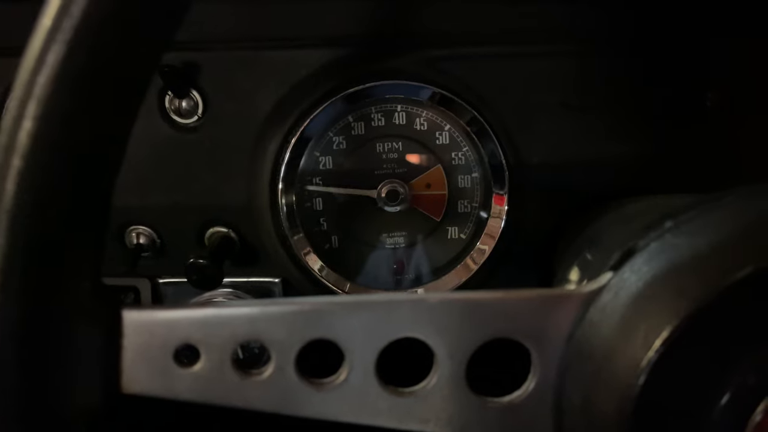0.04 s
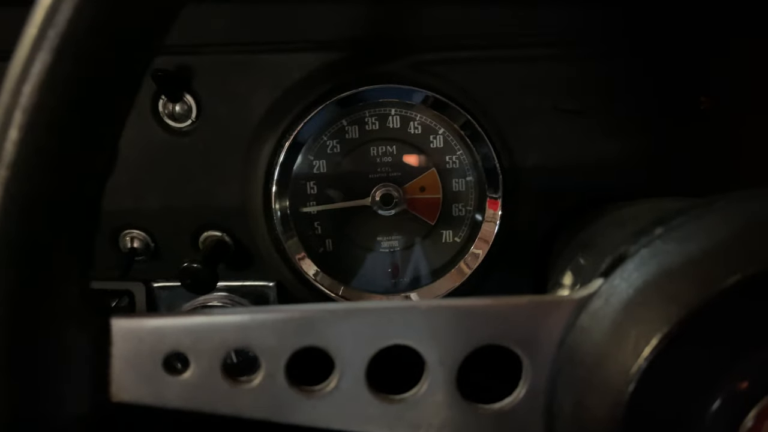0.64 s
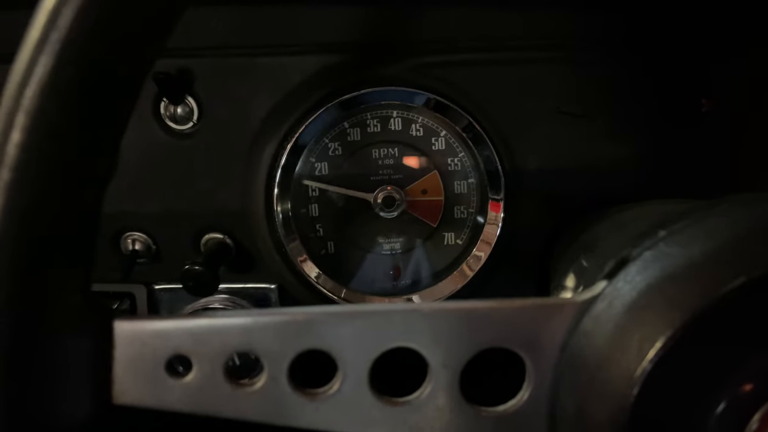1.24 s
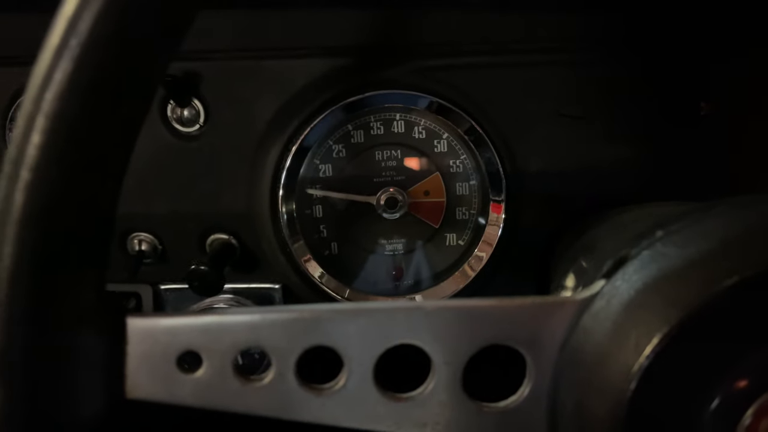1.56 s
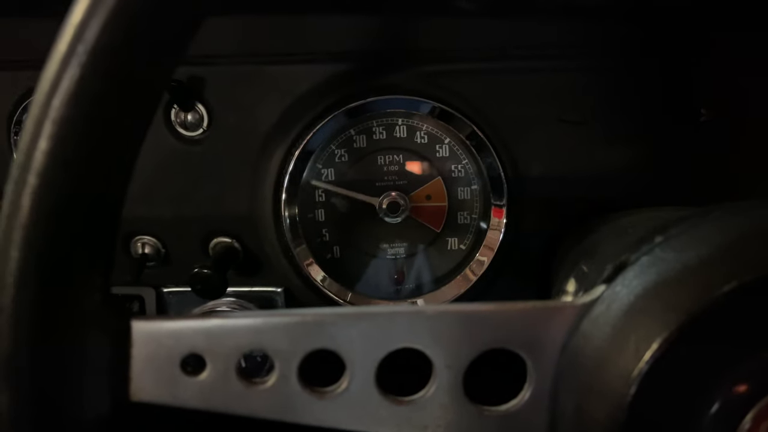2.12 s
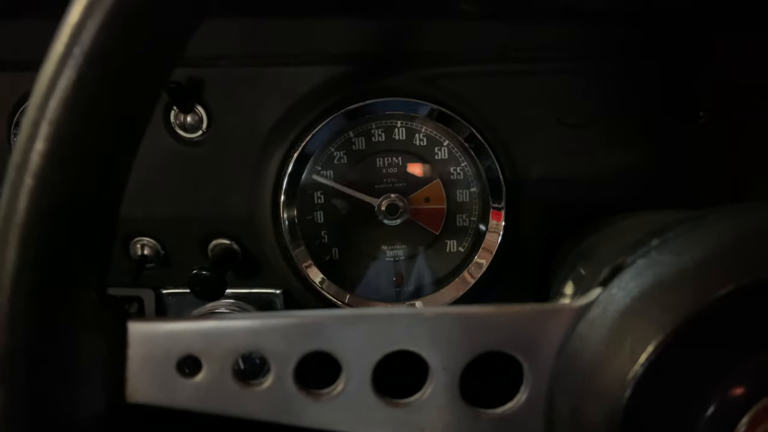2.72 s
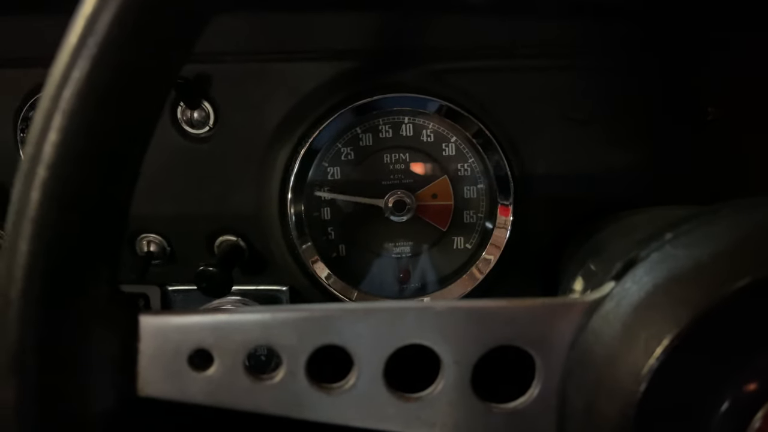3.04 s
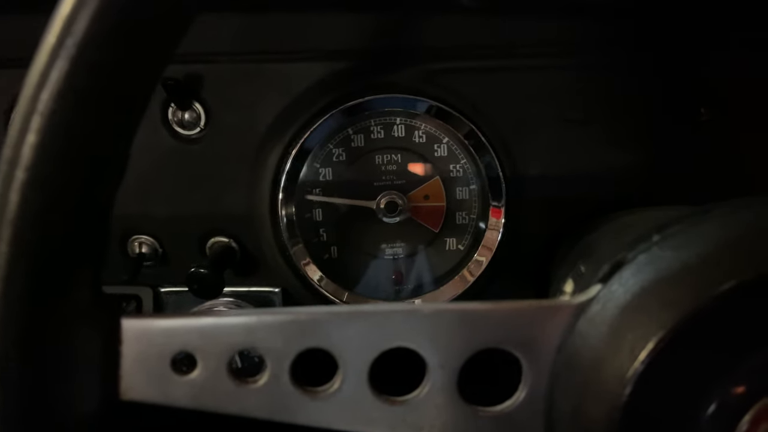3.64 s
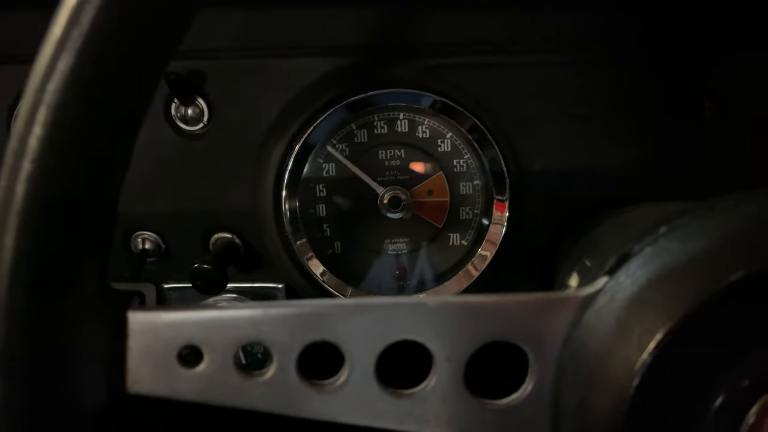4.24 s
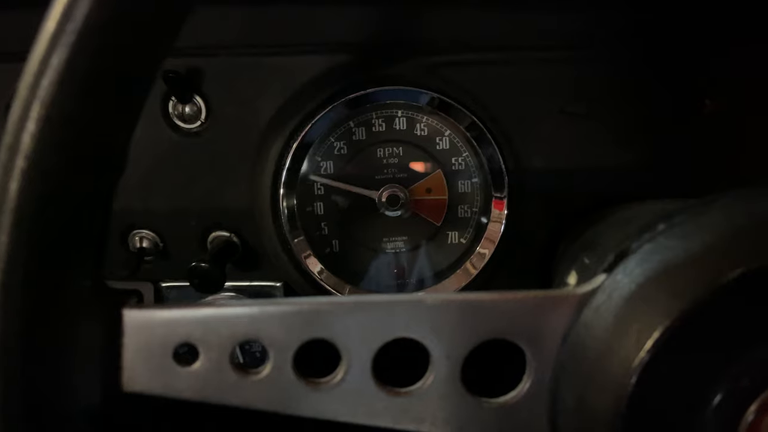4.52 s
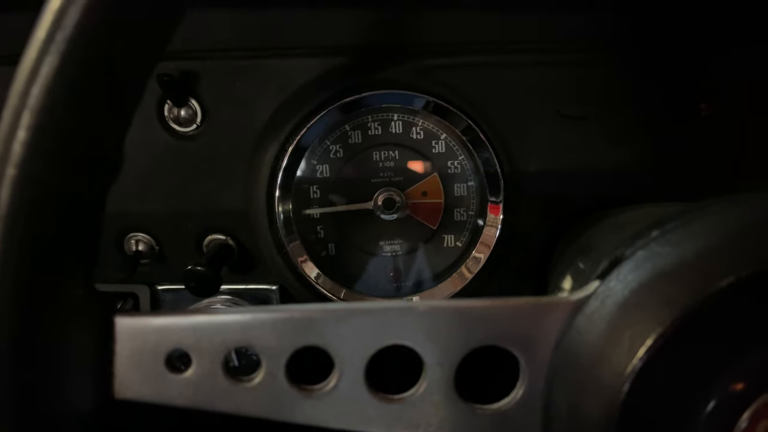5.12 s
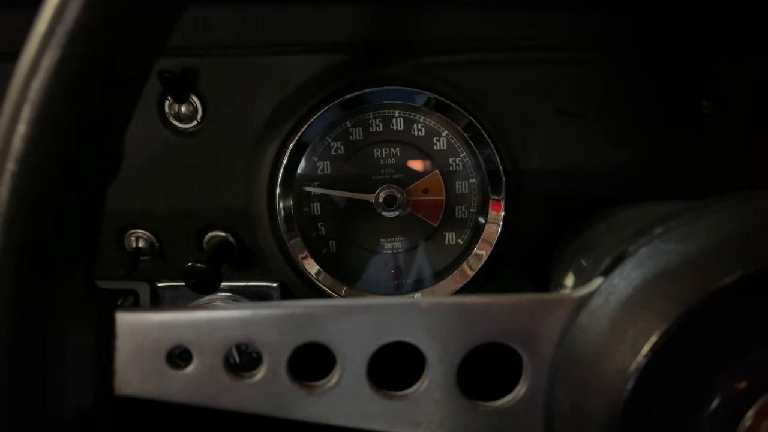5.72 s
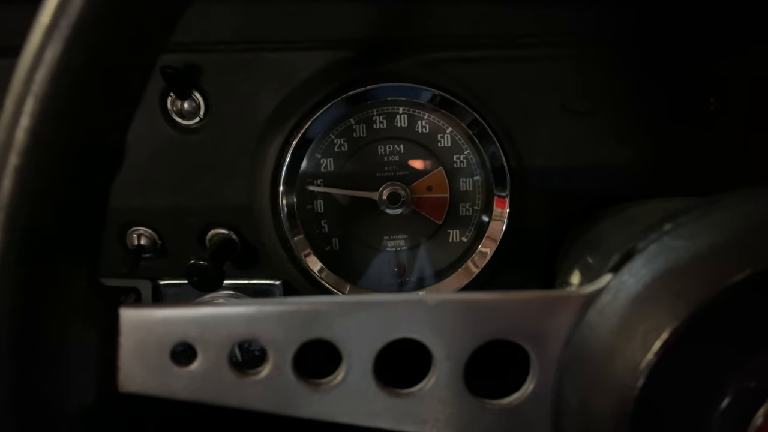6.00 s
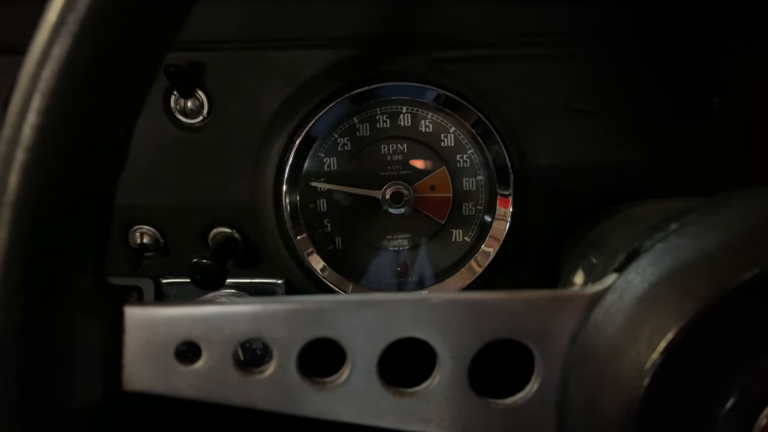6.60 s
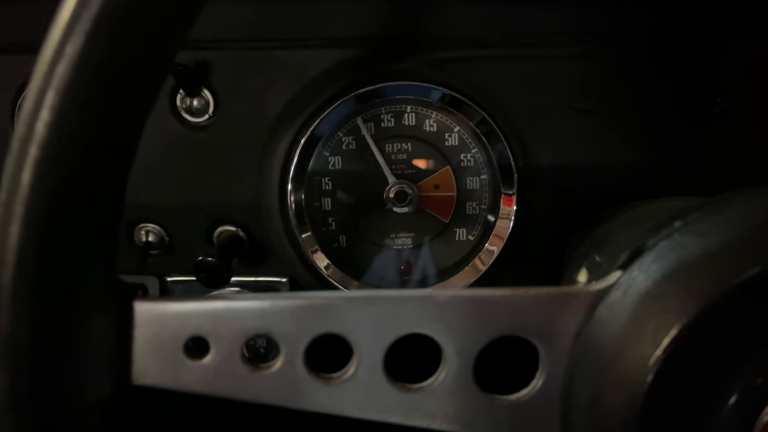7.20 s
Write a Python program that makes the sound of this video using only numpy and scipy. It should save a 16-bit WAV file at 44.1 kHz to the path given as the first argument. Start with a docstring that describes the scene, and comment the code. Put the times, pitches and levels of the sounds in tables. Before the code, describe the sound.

Inside a small car, a misfiring engine throbs deeply and close by, with light valve ticking. A weak rev is followed by two sharper ones, then the engine nearly dies. It picks up into a low, sputtering stretch with a few exhaust cracks before a final, higher rev. Every surge brings a rough exhaust bark, a spitting intake hiss and small metallic pings, while the low notes boom in the tight cabin.

```python
"""Stumbling sports car, from the driver's seat

A four-cylinder engine stumbles near idle and is blipped five times. Uneven firings and misfires
boom in the cabin; with the throttle open the exhaust barks and the carburettors hiss and spit.
The valve gear ticks, and a loose metal part pings and chatters under load."""
import sys
import numpy as np
from scipy import signal
from scipy.fft import rfft, irfft, next_fast_len
from scipy.io import wavfile
from scipy.ndimage import uniform_filter1d, minimum_filter1d, map_coordinates

SR = 44100
rng = np.random.default_rng(int(sys.argv[2]) if len(sys.argv) > 2 else 0)


def bounce(signal):
    """Save signal as a 16-bit WAV file at the path given by the first command-line argument."""
    frames = np.transpose(np.atleast_2d(signal))
    limited = np.clip(frames, -1, 1)
    pcm = np.round(limited * 32767).astype(np.int16)
    wavfile.write(sys.argv[1], SR, pcm)


N = 324135

# engine speed: t/s, firing rate/Hz
FIRING_RATE = [(0, 50), (.14, 49.5), (.22, 38.4), (.33, 33.4), (.45, 31.8), (.55, 31.9), (.68, 45),
               (.96, 56.7), (1.04, 57.7), (1.25, 55.3), (1.35, 52.8), (1.58, 45), (1.76, 42.3), (1.85, 54),
               (2.01, 59.9), (2.2, 85), (2.31, 90.3), (2.39, 84.9), (2.58, 67.8), (2.76, 59.8),
               (3.01, 45.7), (3.09, 43.9), (3.23, 38.5), (3.34, 35.8), (3.47, 50.2), (3.75, 51.6),
               (3.87, 70), (3.99, 83.5), (4.06, 89.5), (4.13, 84), (4.3, 64.9), (4.38, 58.4), (4.65, 45.6),
               (4.73, 43.7), (4.83, 36.6), (5.24, 33.6), (5.36, 45.8), (5.42, 50.8), (5.55, 49.3),
               (5.65, 50.3), (5.87, 48.8), (6.05, 45.5), (6.39, 50.3), (6.65, 49.1), (6.74, 59.5),
               (6.9, 79.7), (7, 93.2), (7.12, 102.7), (7.19, 99.2), (7.35, 86.8)]
# accelerator: press/s, lift/s, depth/0-1, opening time/s, closing time/s, air gulp/dB
PEDAL = [(0.58, 1.19, 0.78, 0.023, 0.18, 0.5), (1.775, 2.312, 0.99, 0.054, 0.072, 3.5),
         (3.352, 4.058, 0.95, 0.027, 0.047, 1), (5.271, 6.587, 0.83, 0.039, 0.046, 4),
         (6.672, 7.159, 0.84, 0.0073, 0.066, 1.5)]
# cylinders in firing order: strength/dB
CYLINDERS = [4.5, 0, 0, 0]
# stumbles: t/s, depth/dB
MISFIRES = [(.51, 13), (.955, 6), (1.07, 11), (1.275, 8), (2.025, 9), (2.47, 12), (2.72, 13), (2.835, 13),
            (3.73, 7), (4.425, 23), (4.505, 15), (4.75, 2), (6.11, 14), (6.65, 4), (6.905, 7)]
# brief swells of the exhaust roar: t/s, swell/dB
SWELLS = [(.61, 3.5), (.98, 6), (1.12, 8.5), (2.075, 4), (2.15, 4), (2.24, 1.5), (3.87, 10.5), (3.96, 2),
          (5.5, 2.5), (5.65, 3.5), (5.72, 5.5), (6.55, 2), (6.78, 12.5), (6.88, 2), (7.28, 8.5)]
# carburettor spit-backs: t/s, swing/dB
SPITS = [(.977, 3.5), (1.115, 2.5), (1.978, 3.5), (2.1, 2.5), (2.155, 0), (3.631, 4), (3.695, 3),
         (3.88, -2.5), (3.97, 0.5), (4.04, 2.5), (5.511, 4.5), (5.576, 2), (5.656, 5.5), (5.727, 3),
         (5.829, 4.5), (5.899, 3), (5.989, 3), (6.071, 3), (6.17, 5), (6.263, 3.5), (6.34, 3.5), (6.406, 4),
         (6.501, 3.5)]
# near-stalls: t/s, depth/dB
LULLS = [(.25, 2), (.45, -1), (4.78, 1)]
# low orders: multiple of firing rate, cabin boom level/dB, pipe note level/dB
ORDERS = [(.5, -35, -6.5), (.75, -23, -1), (1, 2, -17), (1.5, -19, -11.5), (2, -4, 0), (2.5, -26, -8),
          (3, -3.5, 2.5), (3.5, -35, 0.5), (4, -8.5, -13.5), (5, -7, -1), (6, -9, -5), (7, -13, -5.5)]
# one order booms or drops out: t/s, multiple of firing rate, swing/dB
ORDER_SWINGS = [(.1, 2, -10), (.1, 4, -12), (.43, 3, -8), (.79, 4, 7), (1.46, 4, 7), (1.66, 1, -16),
                (1.78, 4, 7), (1.9, 1, 4), (1.92, 2, -6), (2.58, 1, 3.5), (2.61, 3, -10), (2.76, 3, 7),
                (2.95, 4, 4), (3.11, 1, -11), (3.84, 3, 4), (4.38, 3, -8), (4.55, 4, -9), (4.74, 1, -10),
                (6, 3, -11), (6.32, 4, 5), (6.6, 1, -8), (6.79, 3, 4), (7.26, 2, 7)]
# cabin response to tones: f/Hz, level/dB
BOOM_SPECTRUM = [(32, -55), (40, -22.5), (44, -14.5), (48, -11.5), (68, -11), (90, -13), (100, -19),
                 (112, -15), (128, -24.5), (160, -30), (220, -33.5), (330, -40.5), (450, -39), (600, -58)]
# cabin air modes: f/Hz, width/Hz, lift/dB
CABIN_MODES = [(178, 10, 16), (198, 11, 17), (256, 14, 16), (302, 16, 10), (443, 24, 7)]
# exhaust note, throttle open: f/Hz, level/dB
PIPE_SPECTRUM = [(50, -15.5), (100, -16.5), (140, -11), (175, -22), (200, -13), (235, -22.5), (275, -37),
                 (320, -25), (380, -33), (440, -23.5), (520, -60)]
# cabin response to thuds: f/Hz, level/dB
THROB_SPECTRUM = [(33, -67.5), (49, 15.5), (70, 20), (110, 10), (160, 5.5), (215, 1.5), (240, -9),
                  (310, -12), (380, -16.5), (700, -51.5)]
# exhaust under load: f/Hz, level/dB
BARK_SPECTRUM = [(150, -36.5), (320, 3.5), (400, -0.5), (540, 0.5), (900, -4.5), (1100, -12.5),
                 (1600, -19.5), (2400, -13.5), (4000, -33.5), (9000, -69)]
# pipe and panel resonances: f/Hz, width/Hz, lift/dB
PANEL_MODES = [(176.9, 8.2, 11), (196.5, 4.5, 3.5), (255.2, 6.5, 12.5), (300, 22, 3.5), (443, 22, 8),
               (590, 8, 1.5), (672, 21, 7.5), (746.8, 21, 9.5), (767, 154, 5.5), (832.4, 14, 6.5),
               (878, 22, 5), (922, 16, 3.5), (1096, 33, 4), (1365, 16, 3.5), (1430, 26, 5.5),
               (1530, 36, 2.5), (2016, 50, 5)]
# single hard firings: t/s, level/dB
BANGS = [(0.601, -28), (1.12, -19.5), (5.642, -20), (5.662, -26), (5.706, -19), (5.728, -24), (5.75, -24),
         (6.472, -21), (6.492, -29), (6.545, -24), (6.562, -23)]
# their crack: f/Hz, level/dB
BANG_SPECTRUM = [(200, -16), (500, 7), (900, -4), (1600, -9), (2600, -11.5), (5000, -24), (12000, -40)]
# intake hiss: f/Hz, level/dB
INTAKE_SPECTRUM = [(400, -10), (900, 5.5), (1500, 6.5), (2200, 3), (3200, -3), (4500, -5), (7200, -4),
                   (9000, 0), (10700, 5.5), (11400, 1), (12000, -7.5), (12500, -14), (13200, -38)]
# valve gear: f/Hz, level/dB
VALVE_SPECTRUM = [(300, 15), (800, -5.5), (1150, -1.5), (2100, -7.5), (2800, -12), (7000, -19.5),
                  (11500, -23), (13000, -48)]
# loose part, strikes: t/s, relative peak/dB
PINGS = [(.881, -19), (1.019, -21), (1.104, -18), (1.141, -13), (1.96, -11), (2.215, -16), (3.538, -22),
         (3.69, -27), (3.7325, -17), (3.7636, -17), (3.873, -20), (3.9142, -17), (5.374, -19),
         (5.491, -12.5), (5.568, -21), (5.705, -20), (5.974, -22), (6.392, -25), (6.6843, -12),
         (6.752, -16), (6.867, -16), (7.049, -16)]
# loose part, modes: f/Hz, level/dB, t60/s
METAL_MODES = [(753, 0, 0.086), (1210, -29, 0.046), (1373, -6.5, 0.1), (1480, -3.5, 0.077),
               (1516.5, 3.5, 0.093), (1584, -1.5, 0.052), (2094, -27, .04)]
# short hissy spits and small knocks: t/s, relative level/dB, f/Hz, width/Hz
BURSTS = [(0.261, -40, 4170, 3030), (2.319, -28, 5500, 6010), (4.039, -28.5, 4990, 5025),
          (4.995, -15.5, 358, 110), (6.177, -23, 2040, 220)]
# left-right likeness: f/Hz, coherence/0-1
COHERENCE = [(60, .999), (200, 0.6), (300, 0.65), (450, 0.19), (1100, 0.034), (1600, 0.14), (3500, 0.31),
             (5500, 0.61), (7200, 0.11), (8400, 1), (12000, 1)]
# microphone ports: f/Hz, left lead/rad
PORT_PHASE = [(100, 0), (450, .2), (750, 1.3), (1500, 0), (2700, .9), (6500, .4), (7700, 1), (8700, -.1),
              (10200, -3.14), (11700, -6.28)]
# microphone ports: f/Hz, left minus right/dB
PORT_BALANCE = [(60, .5), (300, 2.5), (600, 4), (1500, -0.5), (2600, 2), (4500, 5), (7000, 3.5), (8700, 0)]

# gain laws: shut at cruise/dB, added when open/dB, speed/(dB/octave), strain/(dB/unit), swell share
THROB_LAW = (-27.5, 10.5, -1, .7, .5)
BARK_LAW = (-41, 8.5, 10.5, 1, 1.11)
HISS_LAW = (-43.5, 13, 1, 0.12, .5)
RATTLE_LAW = (-53, 13, 8.5, 1, 1)

IDLE_HZ, CRUISE_HZ, ON_SONG_HZ = 32, 50, 66.3  # firing rates
FALTER_LEAD_S, FALTER_SHARE = 0.044, 0.46  # draught dips before each spit
SPIT_BARK_SHARE, SPIT_THROB_SHARE = .45, .6
THUD_BELOW_OPENING = .3  # below this a stumble thuds; above, it leaves a gap


def firings(turns, scatter_db, jitter_s, miss_share=0):
    """One pulse per turn of phase: unequal cylinders, uneven burns, weak misses."""
    at = np.flatnonzero(np.diff(np.floor(turns)) > 0)
    burn, late = rng.standard_normal((len(at), 2)).T
    lit = np.where(rng.random(len(at)) < miss_share, .25, 1)
    strength = amp(np.resize(CYLINDERS, len(at)) + scatter_db * burn) * lit
    return np.bincount(np.clip(at + (jitter_s * SR * late).astype(int), 0, N - 1), strength, N)


def throttle():
    """Opening, 0-1: rises at each press, holds, closes on lift."""
    t = np.arange(N) / SR
    fade = lambda start_s, tau_s: np.exp(-np.maximum(t - start_s, 0) / tau_s)
    return sum(depth * (1 - fade(press_s, rise_s)) * fade(lift_s, close_s)
               for press_s, lift_s, depth, rise_s, close_s, _ in PEDAL)


def strain(rate_hz, smooth_s):
    """Engine pull: octaves gained per second times octaves above idle."""
    octaves_per_s = uniform_filter1d(np.gradient(np.log2(rate_hz)) * SR, size=int(smooth_s * SR))
    return np.maximum(octaves_per_s, 0) * np.log2(rate_hz / IDLE_HZ)


def level(law, opening, rate_hz, pull):
    """Layer gain from throttle, speed, strain and brief swells."""
    shut_db, open_db, octave_db, strain_db, swell_share = law
    speed_db = octave_db * np.log2(rate_hz / CRUISE_HZ)
    swell_db = swell_share * bumps(SWELLS, half_s=0.063)
    return amp(shut_db + open_db * opening + speed_db + strain_db * pull + swell_db)


def boom(turns, rate_hz, opening):
    """Low orders as tones: they swell in the cabin modes and sing in the open exhaust."""
    tones = np.zeros(N)
    song = opening * np.interp(rate_hz, [CRUISE_HZ, ON_SONG_HZ], [0.32, 1])
    for order, boom_db, note_db in ORDERS:
        hz = order * rate_hz
        fade_db = 4 * (order > 2) * np.log2(rate_hz / IDLE_HZ)  # pulses round off with speed
        cabin_gain = amp(along(BOOM_SPECTRUM, hz) + resonances(CABIN_MODES, hz) + boom_db - fade_db)
        pipe_gain = song * amp(along(PIPE_SPECTRUM, hz) + note_db)
        swing_db = bumps([(s, db) for s, k, db in ORDER_SWINGS if k == order], half_s=0.051)
        flutter_db = (1.7 if order == 1 else 3.2) * wobble(30)
        gain = np.hypot(cabin_gain, pipe_gain) * amp(swing_db + flutter_db)
        tones += gain * np.cos(2 * np.pi * order * turns)
    return np.sqrt(2) * dispersed(tones, delay_s=.008, corner_hz=100)


def throb(turns, rate_hz, pulses, gas_share):
    """Firing unevenness and higher orders thud in the cabin."""
    mean_push = pulses.sum() / turns[-1] * rate_hz / SR
    low_orders = mean_push * (1 + 2 * sum(np.cos(2 * np.pi * k * turns) for k in range(1, 4)))
    mid_only = np.array([[1], [0]])
    thuds = unit(pulses - low_orders) * mid_only + gas_share * puffs(pulses, decay_s=0.0066)
    thuds = dispersed(thuds, delay_s=0.01468, corner_hz=283.0)
    return steady(spread(body(thuds, THROB_SPECTRUM)), window_s=0.058)


def bark(turns, pulses, drone_db, echo_s):
    """Each firing cracks through the pipe with a puff of gas, over a pitched drone."""
    pulse_and_echo = unit(np.array([pulses, np.roll(pulses, int(echo_s * SR))]))
    cracks = cabin(pulse_and_echo, t60_s=0.13, wet=0.55)
    gas = unit(cabin(puffs(pulses, decay_s=.016), t60_s=.12, wet=.45))
    rough = unit(body(cracks + gas, BARK_SPECTRUM))
    clean = unit(body(drone(turns, count=15, flutter_db=3), BARK_SPECTRUM))
    return steady(spread(rough + amp(drone_db) * clean), window_s=.05)


def drone(turns, count, flutter_db):
    """Steady part of the firings: crankshaft orders from the ninth up, each wavering alone."""
    crank = np.exp(1j * np.pi * turns)
    phases = np.exp(2j * np.pi * rng.random((count, 2, 1)))
    return unit(sum(amp(flutter_db * wobble(20)) * (phase * crank ** k).real
                    for k, phase in enumerate(phases, 9)))


def bangs(decay_s):
    """Late, hard firings: one sharp crack each through the pipe."""
    t = np.arange(N) / SR
    flare = sum(amp(db) * (t >= s) * np.exp(-np.abs(t - s) / decay_s) for s, db in BANGS)
    return flare * unit(spread(body(rng.standard_normal((2, N)), BANG_SPECTRUM)))


def intake(turns, pulse_depth, flutter_db):
    """Air hisses through the carburettors, harder at each intake stroke."""
    suction = (1 + pulse_depth * np.cos(2 * np.pi * turns)) * amp(flutter_db * wobble(45))
    hiss = cabin(rng.standard_normal((2, N)), t60_s=.1, wet=.25)
    return unit(suction * spread(body(hiss, INTAKE_SPECTRUM)))


def valves(turns, rate_hz, db_per_octave):
    """Tappets tick twice per firing, louder with speed."""
    taps = firings(2 * turns, scatter_db=1.5, jitter_s=.001)
    ticks = steady(spread(body(puffs(taps, decay_s=0.11), VALVE_SPECTRUM)), window_s=0.022)
    return ticks * amp(db_per_octave * np.log2(rate_hz / CRUISE_HZ))


def rocker_ring(turns, ring_hz, decay_s):
    """Tappets keep one thin metallic note ringing."""
    taps = firings(2 * turns, scatter_db=2.5, jitter_s=.002)
    t = np.arange(SR // 8) / SR
    mode = np.sin(2 * np.pi * ring_hz * t) * np.exp(-t / decay_s)
    return unit(signal.fftconvolve(taps, mode)[:N])


def metal(contact, crack_db=-12):
    """Contacts ring the loose part's modes, with a dull crack on top."""
    t = np.arange(SR // 10) / SR
    modes = sum(amp(db - 60 * t / t60_s) * np.sin(2 * np.pi * hz * t) for hz, db, t60_s in METAL_MODES)
    crack = signal.lfilter(*signal.butter(1, [900, 3000], 'band', fs=SR), contact)
    return unit(signal.fftconvolve(contact, modes)[:len(contact)]) + amp(crack_db) * unit(crack)


def pings(gain_db, skitter, bounce_s):
    """The loose part strikes hard and skitters."""
    out = np.zeros(N + SR)
    t = np.arange(SR // 8) / SR
    for s, db in PINGS:
        contact = (t == 0) + skitter * rng.standard_normal(len(t)) * np.exp(-t / bounce_s)
        strike = metal(contact)
        out[round(s * SR):][:len(t)] += amp(gain_db + db) * strike / np.abs(strike).max()
    return out[:N]


def chatter(turns, contact_s):
    """Firings shake the loose part: taps of unequal strength."""
    taps = firings(turns, scatter_db=4, jitter_s=.002)
    ringing = np.array([metal(contact) for contact in puffs(taps, contact_s)])
    return steady(spread(ringing), window_s=.08)


def bursts(gain_db):
    """Short hissy spits and small knocks: band noise; narrower rises softer and rings longer."""
    out = np.zeros(N + SR)
    t = np.arange(SR // 4) / SR
    hz = np.fft.rfftfreq(2 * len(t), 1 / SR)
    for s, db, centre_hz, width_hz in BURSTS:
        response = 1 / (1 + (2 * (hz - centre_hz) / width_hz) ** 4)
        band = irfft(rfft(rng.standard_normal(2 * len(t))) * response)[:len(t)]
        decay_s = 0.0021 + .4 / width_hz
        rise = 1 - np.exp(-(np.pi * t * width_hz) ** 2)
        out[round(s * SR):][:len(t)] += amp(gain_db + db) * unit(band) * rise * np.exp(-t / decay_s)
    return out[:N]


def puffs(pulses, decay_s):
    """Two noises that flare at each pulse and die away."""
    flare = signal.lfilter([1], [1, -np.exp(-1 / (decay_s * SR))], pulses)
    return unit(flare * rng.standard_normal((2, N)))


def dispersed(x, delay_s, corner_hz):
    """The long exhaust delays lows more than highs."""
    return filtered(x, lambda hz: np.exp(-2j * np.pi * delay_s * corner_hz * np.arctan(hz / corner_hz)))


def body(x, spectrum):
    """Minimum-phase colour: a broad spectrum plus ringing pipe and panel modes."""
    size = 16384
    hz = np.fft.rfftfreq(size, 1 / SR)
    db = along(spectrum, hz) + resonances(PANEL_MODES, hz)
    cepstrum = irfft(np.log(amp(db)))
    cepstrum[1:size // 2] *= 2
    cepstrum[size // 2 + 1:] = 0
    impulse = irfft(np.exp(rfft(cepstrum)))
    return signal.fftconvolve(x, impulse[None], axes=1)[:, :N]


def cabin(x, t60_s, wet):
    """Boxy cabin reflections fill the gaps between firings."""
    t = np.arange(SR // 4) / SR
    tail = rng.standard_normal((2, len(t))) * amp(-60 * t / t60_s)
    return x + wet * signal.fftconvolve(x[:1], tail / np.linalg.norm(tail[0]), axes=1)[:, :N]


def spread(pair):
    """Two signals as mid and side to left and right, alike in the bass."""
    angle_rad = lambda hz: np.arccos(np.clip(along(COHERENCE, hz), -1, 1)) / 2
    mid, side = filtered(pair, lambda hz: np.array([np.cos(angle_rad(hz)), np.sin(angle_rad(hz))]))
    return np.array([mid + side, mid - side])


def resonances(modes, hz):
    """Summed lift of the modes, dB."""
    return sum(db / (1 + (2 * (hz - centre_hz) / width_hz) ** 2) for centre_hz, width_hz, db in modes)


def bumps(events, half_s):
    """Bell-shaped swell at each event, dB."""
    t = np.arange(N) / SR
    return sum(db * np.exp(-((t - s) / half_s) ** 2) for s, db in events)


def wobble(knots_per_s):
    """Smooth random curve."""
    knots = rng.standard_normal(int(N * knots_per_s / SR) + 4)
    return map_coordinates(knots, [np.arange(N) * knots_per_s / SR])


def steady(x, window_s):
    """Slow level held at rms 1."""
    size = int(window_s * SR)
    power = uniform_filter1d(uniform_filter1d(np.mean(x ** 2, axis=0), size), size)
    return x / np.sqrt(np.abs(power) + 1e-12)


def filtered(x, response):
    """Apply a complex frequency response."""
    size = next_fast_len(N + SR // 2)
    return irfft(rfft(x, size) * response(np.fft.rfftfreq(size, 1 / SR)), size)[..., :N]


def along(points, hz):
    """Interpolate on a log frequency axis."""
    knots_hz, values = np.transpose(points)
    return np.interp(np.log(hz + 1), np.log(knots_hz + 1), values)


def amp(db):
    """dB to amplitude."""
    return 10 ** (np.asarray(db) / 20)


def unit(x):
    """Scale to rms 1."""
    return x / np.sqrt(np.mean(x ** 2) + 1e-20)


def limiter(x, ceiling):
    """Gain ducks briefly around peaks over the ceiling."""
    needed = np.minimum(1, ceiling / (np.abs(x).max(axis=0) + 1e-9))
    return x * uniform_filter1d(minimum_filter1d(needed, size=160), size=160)


def scene():
    """The crankshaft times the engine layers; throttle, speed and strain set levels."""
    rate_hz = np.interp(np.arange(N) / SR, *np.transpose(FIRING_RATE))
    opening = throttle()
    state = opening, rate_hz, strain(rate_hz, smooth_s=0.31)
    turns = np.cumsum(rate_hz) / SR + .025 * wobble(10)  # one turn per firing, plus crank shudder
    burns = firings(turns, scatter_db=3, jitter_s=.0003, miss_share=.08)
    pulses = burns ** np.clip(.45 + opening, .05, 1)  # throttle shut: only pumping air, more even

    stumble_db = bumps(MISFIRES, half_s=0.014)
    falter_db = bumps([(s - FALTER_LEAD_S, db) for s, db in SPITS], half_s=0.018)
    spit_db = bumps(SPITS, half_s=0.018) - FALTER_SHARE * falter_db
    gulp_db = bumps([(press_s + 0.09, db) for press_s, *_, db in PEDAL], half_s=0.12)
    lull_db = bumps(LULLS, half_s=0.13)
    drone_db = np.interp(rate_hz, [50, 80], [-10, 1.5])  # fast firings merge into a note

    tones = amp(0.12 - stumble_db) * boom(turns, rate_hz, opening)
    thuds = level(THROB_LAW, *state) * throb(turns, rate_hz, pulses, gas_share=.25)
    thuds *= amp(SPIT_THROB_SHARE * spit_db + (THUD_BELOW_OPENING - opening) * stumble_db)
    exhaust = level(BARK_LAW, *state) * bark(turns, np.sqrt(pulses), drone_db, echo_s=0.00228)
    exhaust *= amp(SPIT_BARK_SHARE * spit_db)
    air = level(HISS_LAW, *state) * intake(turns, pulse_depth=0.05, flutter_db=1)
    air *= amp(spit_db + gulp_db)
    ticking = amp(-26.5) * valves(turns, rate_hz, db_per_octave=9.0)
    loose = level(RATTLE_LAW, *state) * chatter(turns, contact_s=.007)
    rocker = amp(-52.5) * rocker_ring(turns, ring_hz=2054, decay_s=0.0056)
    hits = pings(gain_db=-1.5, skitter=.06, bounce_s=.006) + bursts(gain_db=1.5) + bangs(decay_s=.009)
    return tones + thuds + (exhaust + air + ticking + rocker + loose) * amp(-lull_db) + hits


def record(dry):
    """Two microphone ports of unequal phase and level, limiter, band limits."""
    low_hz, top_hz = 28, 13000
    sides = np.array([[.5], [-.5]])
    ports = lambda hz: amp(sides * along(PORT_BALANCE, hz)) * np.exp(1j * sides * along(PORT_PHASE, hz))
    band = lambda hz: (hz < top_hz) * hz ** 4 / (hz ** 4 + low_hz ** 4)
    return filtered(limiter(filtered(dry, ports), ceiling=.92), band)


dry = scene()
out = record(dry)
bounce(out)
```